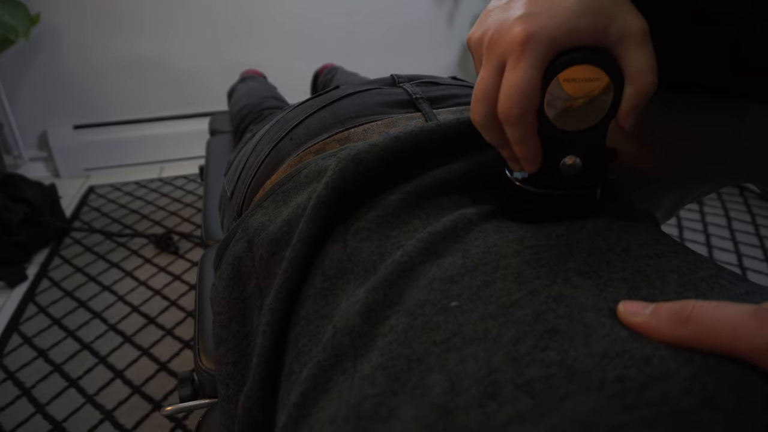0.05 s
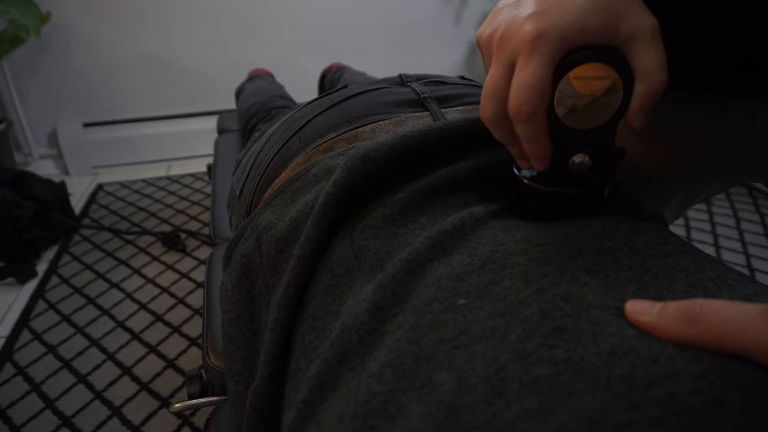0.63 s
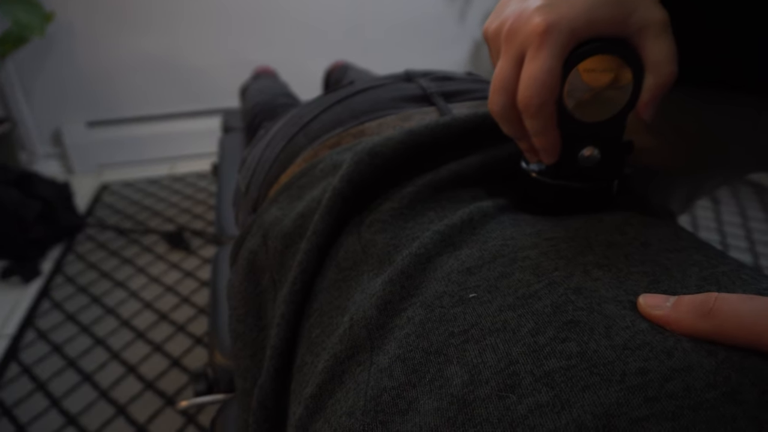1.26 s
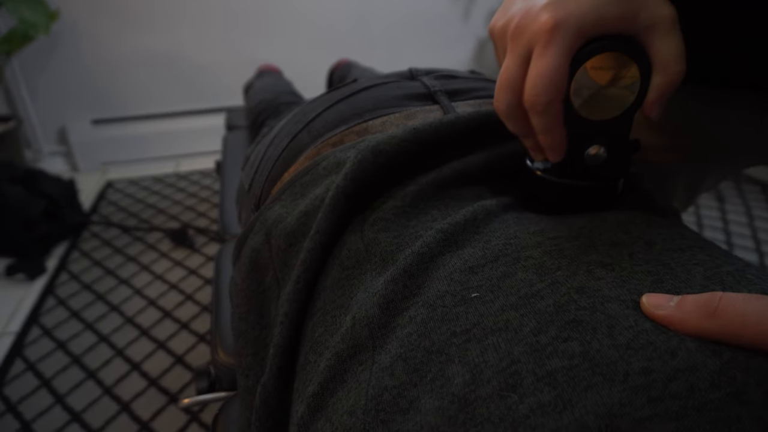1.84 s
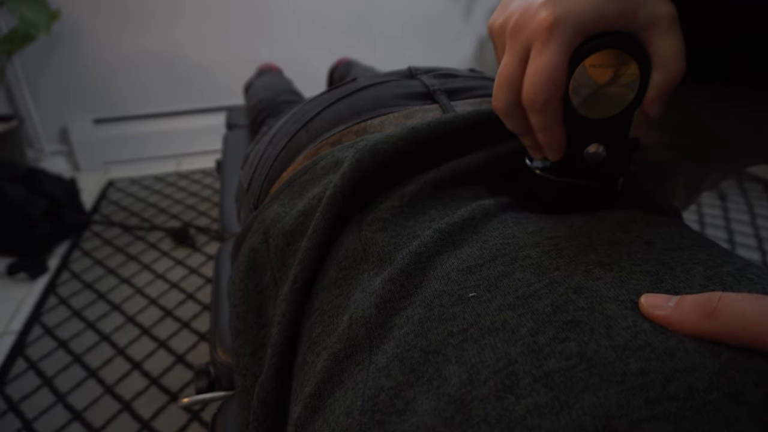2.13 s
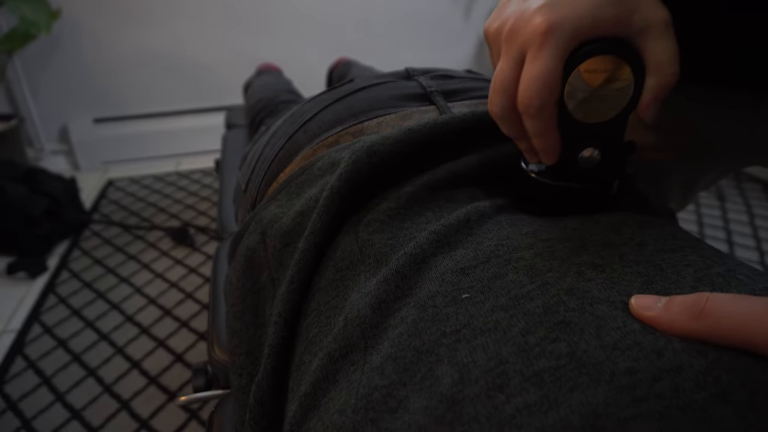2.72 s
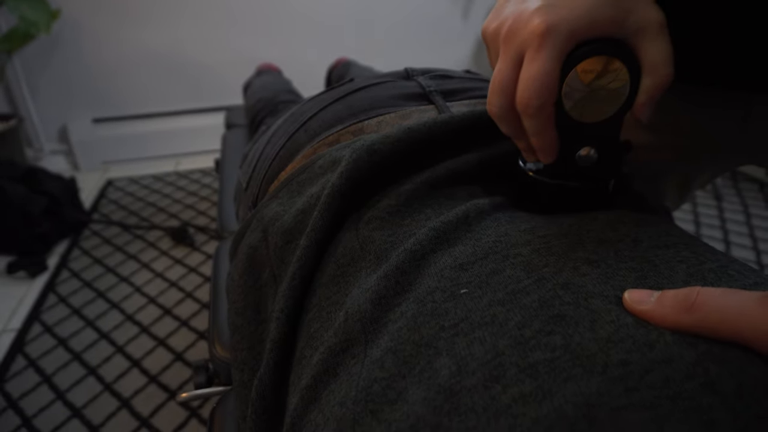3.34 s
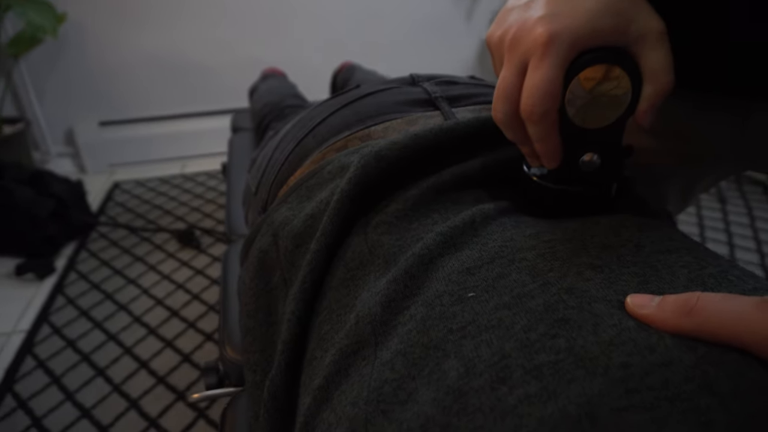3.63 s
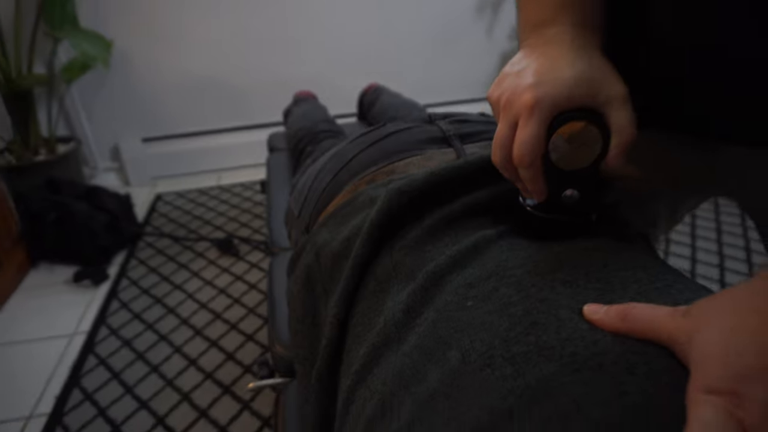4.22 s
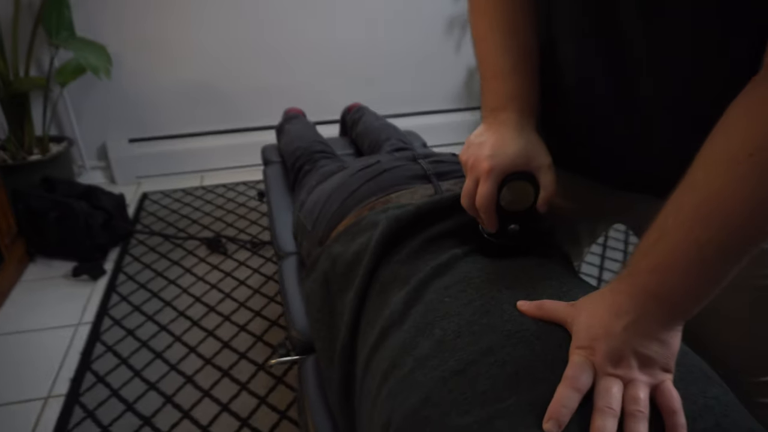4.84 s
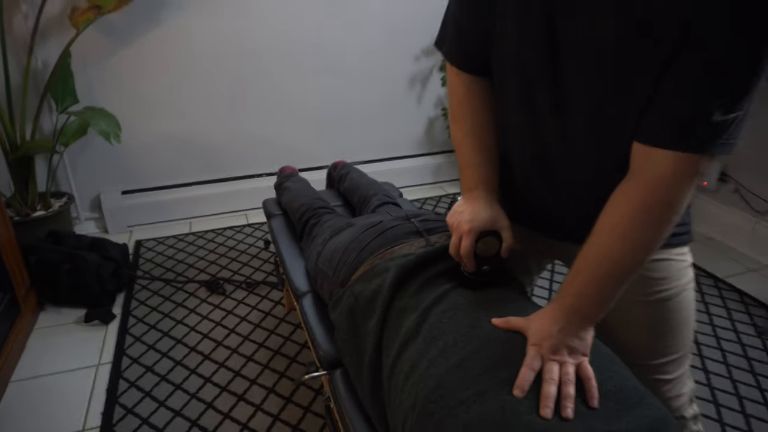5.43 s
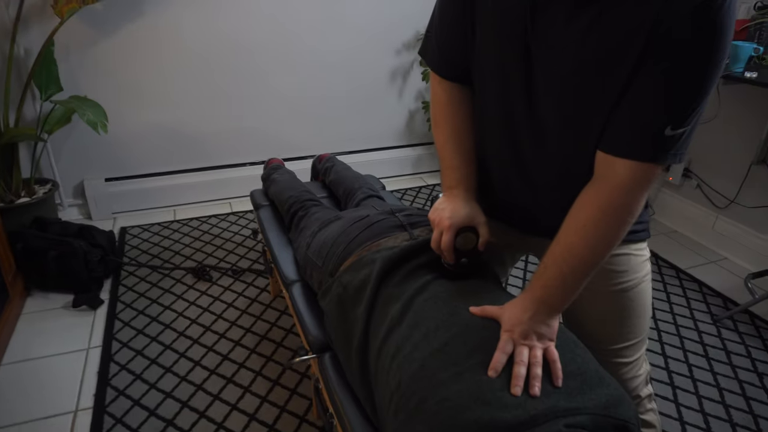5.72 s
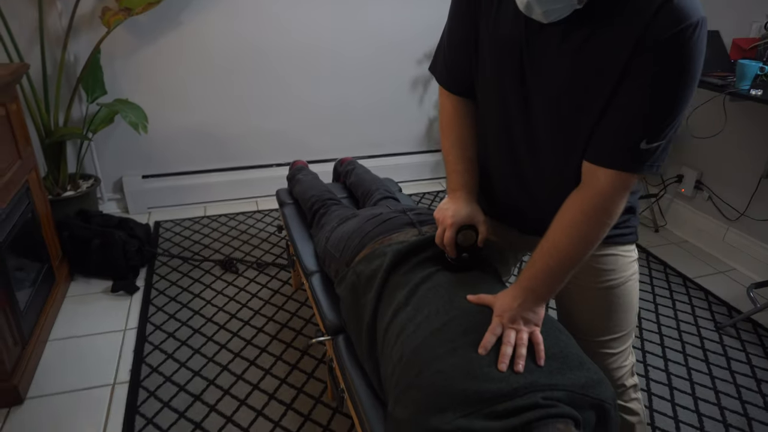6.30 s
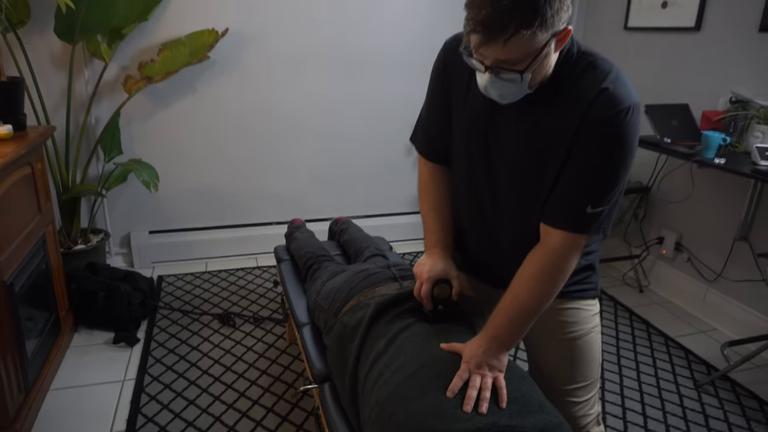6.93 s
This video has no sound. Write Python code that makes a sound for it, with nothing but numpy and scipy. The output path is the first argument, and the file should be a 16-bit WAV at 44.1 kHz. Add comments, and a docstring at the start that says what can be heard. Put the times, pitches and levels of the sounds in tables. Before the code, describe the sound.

A handheld electric percussion massager is already running against a person's back, close to the microphone in a small room. It makes a deep, even throb of about forty-five strokes a second, with a motor hum, a thin gear whine, a raspy plastic rattle and fine rapid ticking. Its speed barely changes. A very faint knock on the padded table comes at about 0.3 seconds. Near 3.7 seconds there is a soft, deep handling bump, and from about 4 seconds the microphone backs away, rumbling unevenly from 5 seconds on. Clothing brushes once, briefly, at about 5.5 seconds. A faint whistle in the housing swells now and then, most near 5.9 seconds. As the distance grows, the throb fades far more than the rattle, so the massager sounds quieter, thinner and slightly more reverberant. It is still running at the end, around 7 seconds.

```python
"""A mains-powered percussion massager runs at 45 strokes a second on a person's back in a small room.
From the start its head throbs, its gears whine and rattle in the plastic housing, and the linkage ticks
at each turn of the stroke. After about four seconds the hand-held microphone backs away, rumbling as
it is carried, and clothing brushes once. The direct sound falls with distance while the room's
reverberation holds, so by the end the throb has faded far more than the rattle."""
import sys
import numpy as np
from scipy import signal
from scipy.fft import rfft, irfft, next_fast_len
from scipy.io import wavfile
from scipy.ndimage import uniform_filter1d, map_coordinates

SR = 44100
rng = np.random.default_rng(int(sys.argv[2]) if len(sys.argv) > 2 else 0)


def log_audio(samples):
    """Write samples as a 16-bit WAV file to the path given in sys.argv[1]."""
    # one column per channel
    frames = np.atleast_2d(samples).T
    # limit to full scale, then quantise
    limited = np.clip(frames, -1, 1)
    pcm = np.round(limited * 32767).astype(np.int16)
    wavfile.write(sys.argv[1], SR, pcm)


N = 306936
TIME = np.arange(N) / SR
RIPPLE_HZ = 119.95  # motor torque pulses at twice the mains frequency
# path of the microphone away from the massager: time_s, distance_m
DISTANCE = [(0, 0.31), (3.75, .3), (4.15, 0.39), (4.7, 0.52), (5.2, 0.83), (5.8, 1.14), (6.96, 1.3)]


def massager():
    """Forced vibration: one slightly unsteady shaft sets the period of head, gears and linkage."""
    # shaft speed: time_s, stroke_rate_hz
    speed = [(0, 44.99), (1.1, 45.02), (2.3, 45.17), (3.4, 45.17), (4.5, 45.22), (5.2, 45.38), (5.8, 45.22),
             (6.96, 45.2)]
    turns = np.cumsum(curves(speed)[0]) / SR + .28 + .0015 * wobble(9)
    return head_throb(turns) + body_hum(turns) + gear_whine(turns) + shell_whistle(turns) + clatter(turns)


def head_throb(turns):
    """Near field: the reciprocating head makes a low pressure wave that falls steeply with distance."""
    # partials of the head: shaft_order, ripple_order, relative_db
    partials = [(1, 0, 0), (2, 0, -21), (0, 1, -29)]
    gain = amp(-24) * spreading(plateau_m=.05, falloff=2.07, far_db=-18.5)
    return gain * shaft_tones(partials, turns, waver_db=.08, nodes_db=.6)


def body_hum(turns):
    """Radiation from a vibrating surface: the shaking body hums at low shaft orders and sidebands."""
    # partials of the body: shaft_order, ripple_order, relative_db
    partials = [(3, 0, -9), (1, 1, -3), (4, 0, -29), (7, -1, -17.5), (2, 1, -17), (5, 0, -20), (1, 2, -9.5),
                (7, 0, -24)]
    gain = amp(-47.5) * spreading(plateau_m=.14, falloff=.9, far_db=-19)
    return gain * shaft_tones(partials, turns, waver_db=.17, nodes_db=.7)


def gear_whine(turns):
    """Periodic meshing: the gears sound high harmonics of the shaft rate."""
    # partials of the gears: shaft_order, ripple_order, relative_db
    partials = [(11, 0, -69), (12, 0, -62.5), (13, 0, -67.5), (12, 1, -68.5), (15, 0, -65), (15, 1, -70),
                (18, 0, -73.5), (19, 0, -77), (20, 0, -72.5), (24, -1, -66.5), (23, 0, -65), (24, 0, -59.5),
                (28, -1, -68), (24, 1, -72.5), (33, -1, -68), (31, 0, -66.5), (35, -1, -63), (31, 1, -67),
                (34, 0, -65.5), (35, 0, -67), (36, 0, -67.5), (37, 0, -63)]
    gain = amp(-.63) * spreading(plateau_m=.21, falloff=1.64, far_db=-11)
    return gain * shaft_tones(partials, turns, waver_db=.7, nodes_db=1.5)


def shell_whistle(turns):
    """Resonance: three gear orders sing in the shell, and the whistle swells now and then."""
    # partials of the whistle: shaft_order, ripple_order, relative_db
    partials = [(36, -1, -62), (47, -1, -60), (45, 0, -72)]
    # swells of the whistle: peak_s, lift_db
    swells = [(2.1, 1.5), (2.9, 3), (3.5, 4), (4.15, 5), (4.8, 4), (5.85, 7.5)]
    swell_db = sum(db * bell_curve(s, half_s=.23) for s, db in swells)
    gain = amp(swell_db + .3) * spreading(plateau_m=.2, falloff=1.7, far_db=-9)
    return gain * shaft_tones(partials, turns, waver_db=.8, nodes_db=.5)


def shaft_tones(partials, turns, waver_db, nodes_db):
    """Modulation: torque ripple puts sidebands beside the shaft harmonics; each tone wavers slightly."""
    out = np.zeros(N)
    for order, side, db in partials:
        cycles = round(order) * turns + round(side) * RIPPLE_HZ * TIME + rng.random()
        level_db = db + nodes_db * standing_waves() + waver_db * wobble(6)
        out += amp(level_db) * np.sin(2 * np.pi * cycles)
    return np.sqrt(2) * out


def clatter(turns):
    """Direct and diffuse fields: rattle, rasp and ticks fade with distance; the gears' reverb holds."""
    rattle = amp(-49) * gear_rattle(tooth_force(turns, repeat=.29, ripple=.078, load=.14, scatter_db=.6))
    rasp = amp(-55.5) * shell_rasp(tooth_force(turns, repeat=.24, ripple=.05, load=.11, scatter_db=3))
    ticks = amp(-60) * linkage_ticks(turns)
    direct = (rattle * spreading(plateau_m=.64, falloff=2.12, far_db=-21)
              + rasp * spreading(plateau_m=1.32, falloff=4.1, far_db=-25)
              + ticks * spreading(plateau_m=.27, falloff=1.26, far_db=-10.5))
    return direct + amp(-10.5) * room(rattle + rasp, t60_s=.36)


def tooth_force(turns, repeat, ripple, load, scatter_db):
    """Amplitude modulation: load and torque ripple vary a tooth force part periodic, part random."""
    size = 1024  # points in one turn
    orders = np.arange(size // 2 + 1)
    phases = np.exp(2j * np.pi * rng.random(len(orders)))
    profile = irfft(phases * (orders >= 38) * (orders < 128))
    regular = unit(np.interp(turns * size, np.arange(size), profile, period=size))
    loose = unit(rng.standard_normal(N) * amp(scatter_db * wobble(700)))
    pressure = 1 + ripple * np.sin(2 * np.pi * RIPPLE_HZ * TIME) + load * np.cos(2 * np.pi * (turns - .8))
    return (repeat * regular + loose) * pressure


def gear_rattle(force):
    """Source and filter: the tooth force is coloured as it leaves the housing."""
    # broad spectrum of the rattle: frequency_hz, gain_db
    spectrum = [(150, -45), (380, -12.5), (600, -3.5), (850, 0.5), (1200, 1.5), (1900, -2), (2250, -1),
                (2500, -10), (3300, -6.5), (4600, -9.5), (5500, -9), (7000, -15.5), (10000, -18),
                (15500, -24.5)]
    return unit(filtered(force, lambda hz: colour(spectrum, hz) * housing(hz)))


def shell_rasp(force):
    """Modal superposition: close shell modes of alternating sign add up to a bright rasp."""
    # buzzing shell modes: centre_hz, width_hz, relative_db
    modes = [(3509, 120, -2.5), (3594, 390, -2.5), (3802, 160, -1), (3990, 185, -6), (4347, 88, -8.5)]

    def response(hz):
        cluster = sum((-1) ** k * amp(db) * resonance(hz, centre, width)
                      for k, (centre, width, db) in enumerate(modes))
        return cluster * resonance(hz, 3670, 1800)
    return unit(filtered(force, response))


def linkage_ticks(turns, jitter_turns=.006, scatter_db=.9, scrape_s=.00095, scrape=.21):
    """Impact excitation: slack closes at set points of each stroke, and the meeting faces scrape."""
    # contacts in one stroke: phase_turns, centre_hz, width_hz, relative_db
    contacts = [(.33, 12200, 1800, -7.5), (.39, 9240, 2400, -4), (.46, 12360, 1400, -4.5),
                (.49, 5050, 1410, 2), (.92, 7200, 3000, -6)]
    out = np.zeros(N)
    touch = signal.windows.gaussian(SR // 100, scrape_s * SR)
    strokes = np.arange(int(turns[-1]))
    for phase, centre, width, db in contacts:
        timing, strength = rng.standard_normal((len(strokes), 2)).T
        onsets = np.searchsorted(turns, strokes + phase + jitter_turns * timing).clip(0, N - 1)
        blows = np.bincount(onsets, amp(scatter_db * strength), N)
        chatter = signal.fftconvolve(blows, touch, "same") * rng.standard_normal(N)
        force = blows + scrape * chatter
        out += amp(db) * unit(filtered(force, lambda hz: resonance(hz, centre, width) ** 2))
    return unit(filtered(out, housing))


def housing(hz):
    """Frequency response: the plastic body lifts the sound at its resonances."""
    # housing modes: centre_hz, width_hz, lift_db
    modes = [(1134, 23, 2), (1511, 56, 6), (2019, 64, 8), (2740, 17, 9), (6400, 290, 4.5), (8000, 650, 6),
             (9000, 180, 5.5), (9450, 230, 5.5), (10200, 210, 3), (11170, 370, 5), (12200, 280, 3.5)]
    return 1 + sum((amp(db) - 1) * resonance(hz, centre, width) for centre, width, db in modes)


def spreading(plateau_m, falloff, far_db):
    """Spreading loss: gain is flat within the plateau, then a power law down to the room's share."""
    metres = curves(DISTANCE)[0]
    direct = (np.hypot(metres[0], plateau_m) / np.hypot(metres, plateau_m)) ** falloff
    return np.hypot(direct, amp(far_db))


def standing_waves(extremes_per_m=4.46):
    """Interference: a tone rises and falls as the microphone crosses the room's peaks and dips."""
    metres = curves(DISTANCE)[0]
    path = extremes_per_m * (metres - metres[0])
    return np.sin(np.pi * path * rng.uniform(.48, 1)) * rng.standard_normal()


def room(x, t60_s):
    """Reverberation: reflections from the near walls merge into an exponentially decaying tail."""
    # colour of the reflections: frequency_hz, gain_db
    walls = [(100, -39), (170, -5), (400, -3), (700, -9.5), (1100, 4.5), (2000, -2), (4000, -2.5),
             (6500, -2.5), (10000, 4.5), (12500, 9.5), (15500, 11)]
    t = TIME[:SR // 2]
    tail = rng.standard_normal(len(t)) * amp(-60 * t / t60_s) * (t > .004)
    wet = signal.fftconvolve(x, tail / np.linalg.norm(tail))[:N]
    return filtered(wet, lambda hz: colour(walls, hz))


def table_knocks():
    """Damped resonance: soft knocks on the padded table give brief, low bands of noise."""
    # knocks: peak_s, level_db, centre_hz
    knocks = [(.27, -52, 290), (3.69, -63, 169)]
    out = np.zeros(N)
    for s, db, centre in knocks:
        thud = unit(filtered(rng.standard_normal(N), lambda hz: resonance(hz, centre, 170)))
        out += amp(db) * thud * bell_curve(s, half_s=.037)
    return out


def cloth_brush():
    """Friction: sliding cloth gives a short swell of noise."""
    # brush of clothing: peak_s, half_length_s, level_db
    brushes = [(5.462, 0.036, -52)]
    # spectrum of the cloth: frequency_hz, gain_db
    spectrum = [(300, -13), (1500, 1), (3000, -4), (6000, -15), (15000, -28)]
    return sum(amp(db) * noise(spectrum) * bell_curve(s, half) for s, half, db in brushes)


def handling():
    """Structure-borne sound: the held microphone rumbles and a sleeve rubs, both more in motion."""
    # shifts of grip and footsteps: peak_s, half_length_s, level_db
    jolts = [(0.01, 0.077, -38), (3.685, 0.057, -26), (5.09, 0.088, -29), (5.37, .06, -27.5),
             (5.61, 0.16, -31.5), (6.03, 0.14, -32), (6.35, 0.16, -31.5), (6.92, .09, -31.5)]
    # spectrum of the rumble: frequency_hz, gain_db
    rumble_spectrum = [(3, -14), (10, -10), (20, -1), (27, -12.5), (36, -26), (60, -42), (150, -125),
                       (400, -120)]
    # spectrum of the sleeve: frequency_hz, gain_db
    sleeve_spectrum = [(60, -9), (170, -15), (250, 0.5), (400, -15), (600, -17), (2000, -49), (15000, -80)]
    log_distance = np.log(curves(DISTANCE)[0])
    pace = uniform_filter1d(np.abs(np.gradient(log_distance)) * SR, SR // 4)
    jolt_gain = sum(amp(db) * bell_curve(s, half) for s, half, db in jolts)
    rumble_gain = amp(-44) + amp(-39) * pace + jolt_gain
    sleeve_gain = amp(-69.5) + amp(-61) * pace
    return rumble_gain * noise(rumble_spectrum) + sleeve_gain * noise(sleeve_spectrum)


def still_air():
    """Ambient noise: a faint, steady floor, strongest in the bass."""
    # spectrum of the quiet room: frequency_hz, gain_db
    spectrum = [(30, -1), (70, -4), (150, -7), (260, -10), (400, -11), (800, -16.5), (2500, -17.5),
                (6500, -38), (10200, -26), (13600, -45), (15500, -29)]
    return amp(-56) * noise(spectrum)


def amp(db):
    """Decibels to gain."""
    return 10 ** (np.asarray(db) / 20)


def unit(x):
    """Scale to rms 1."""
    return x / np.sqrt(np.mean(x ** 2) + 1e-20)


def bell_curve(peak_s, half_s):
    """Gaussian envelope, down to 1/e at half_s from its peak."""
    return np.exp(-((TIME - peak_s) / half_s) ** 2)


def curves(rows):
    """Linear interpolation: one value per sample for each column after the time."""
    times, *columns = np.transpose(rows)
    return [np.interp(TIME, times, column) for column in columns]


def wobble(rate_hz, steps=6):
    """A smooth spline through random knots, rate_hz of them a second."""
    knots = rng.standard_normal(int(N * rate_hz / SR) + 4)
    fine = map_coordinates(knots, [np.arange((len(knots) - 1) * steps) / steps])
    return np.interp(TIME * rate_hz * steps, np.arange(len(fine)), fine)


def filtered(x, response):
    """Linear filtering: the spectrum of x times a frequency response."""
    size = next_fast_len(N + SR // 2)
    return irfft(rfft(x, size) * response(np.fft.rfftfreq(size, 1 / SR)), size)[:N]


def colour(points, hz):
    """Gain through (frequency_hz, gain_db) points on a log axis."""
    frequencies, db = np.transpose(points)
    return amp(np.interp(np.log(hz + 1), np.log(frequencies + 1), db))


def resonance(hz, centre, width):
    """Band-pass response of one damped oscillator."""
    return 1j * hz * width / (centre ** 2 - hz ** 2 + 1j * hz * width)


def noise(points):
    """Coloured noise of rms 1."""
    return unit(filtered(rng.standard_normal(N), lambda hz: colour(points, hz)))


def scene():
    """Superposition: the massager, small contact noises and the still air add in one channel."""
    return (massager() + table_knocks() + cloth_brush() + handling() + still_air())[None]


def record(dry):
    """Band limiting: a steep low-pass removes the highest treble."""
    cutoff_hz = 15730
    band_limit = signal.ellip(12, .1, 90, cutoff_hz, fs=SR, output="sos")
    return signal.sosfilt(band_limit, dry)


dry = scene()
out = record(dry)
log_audio(out)
```